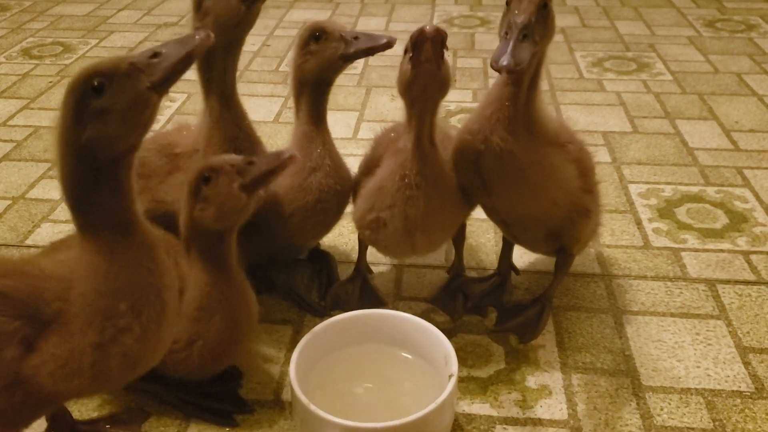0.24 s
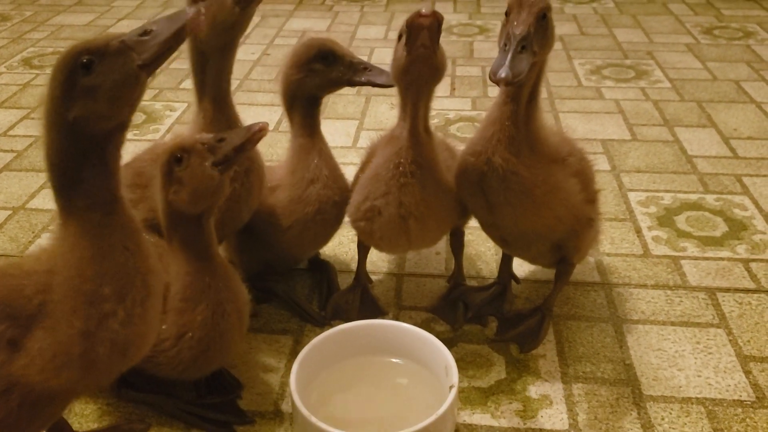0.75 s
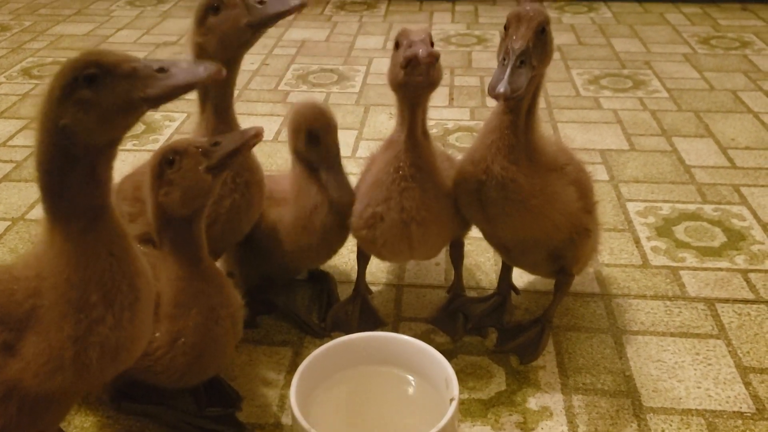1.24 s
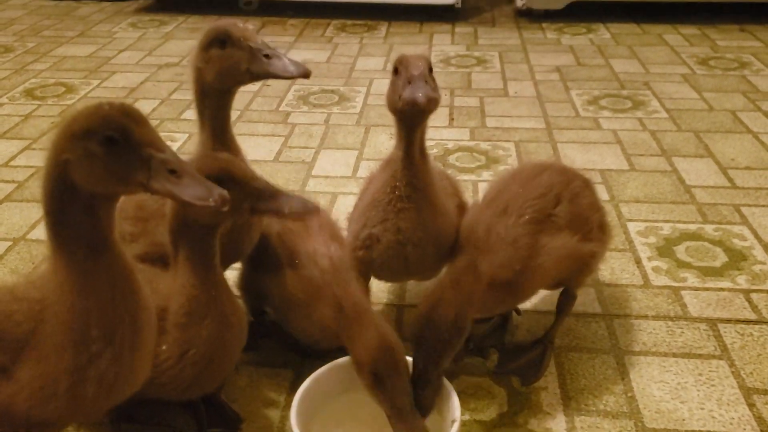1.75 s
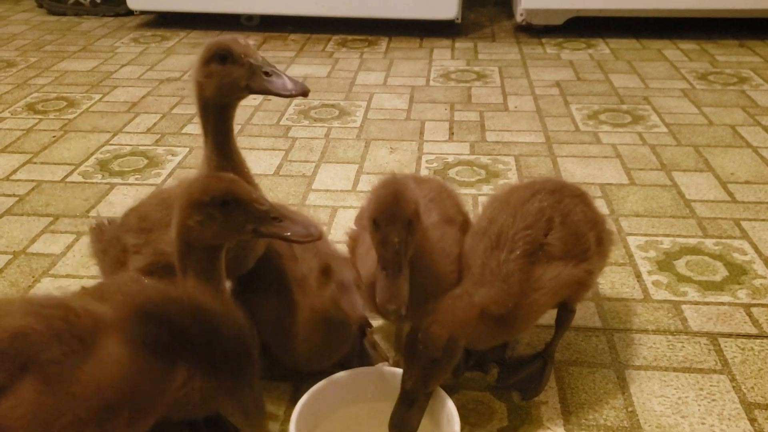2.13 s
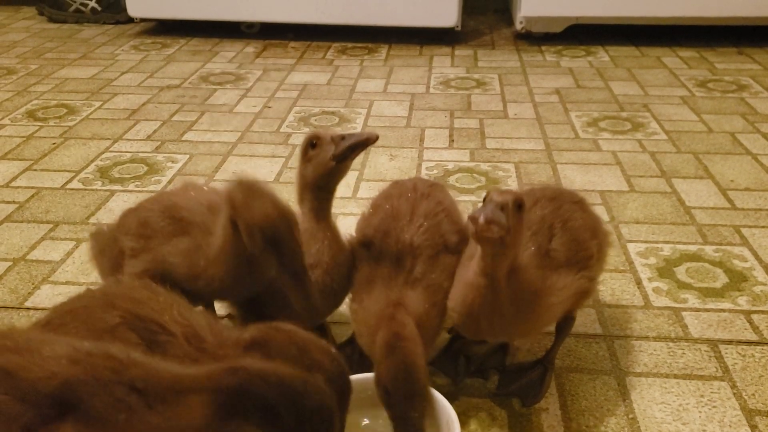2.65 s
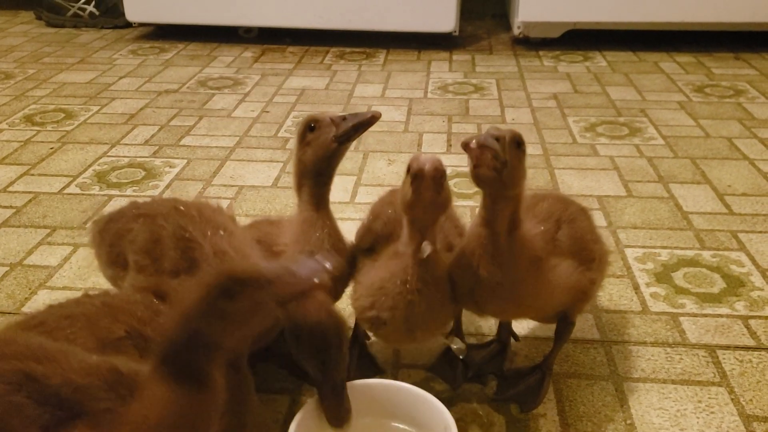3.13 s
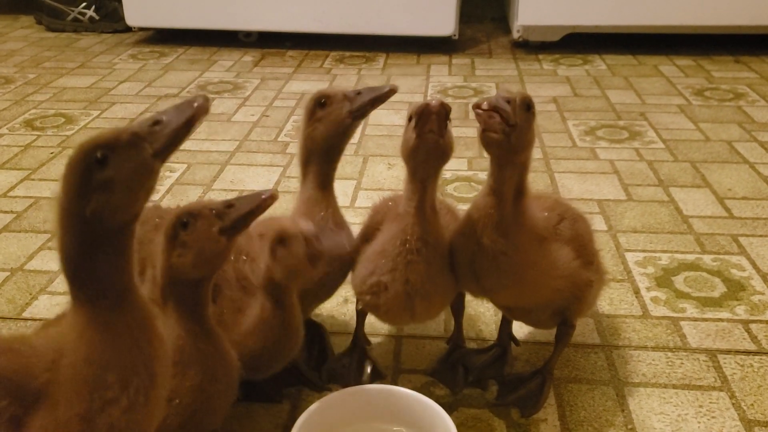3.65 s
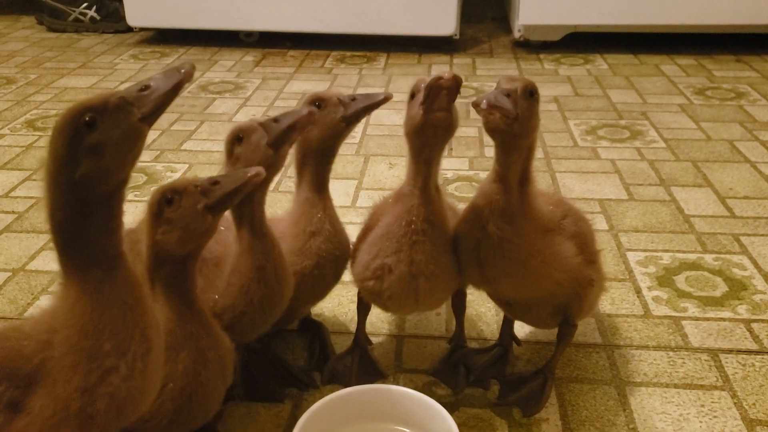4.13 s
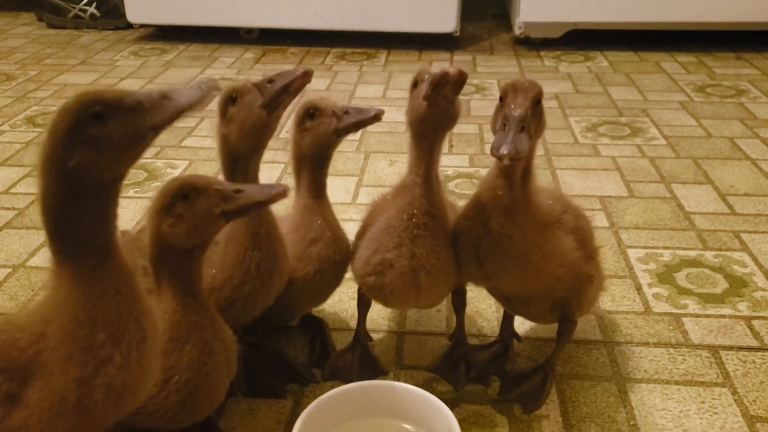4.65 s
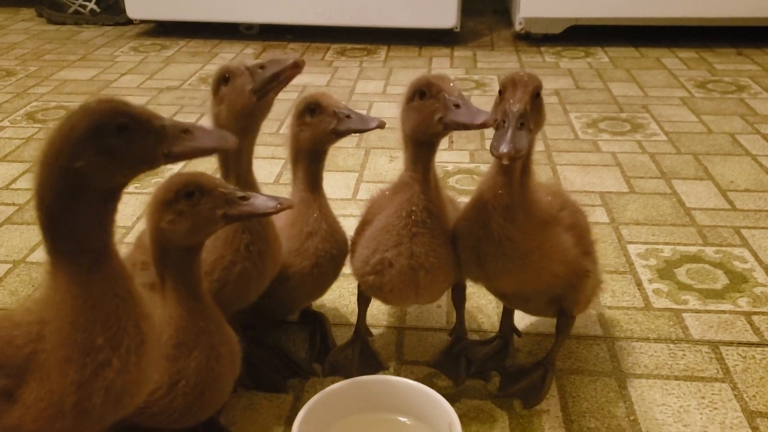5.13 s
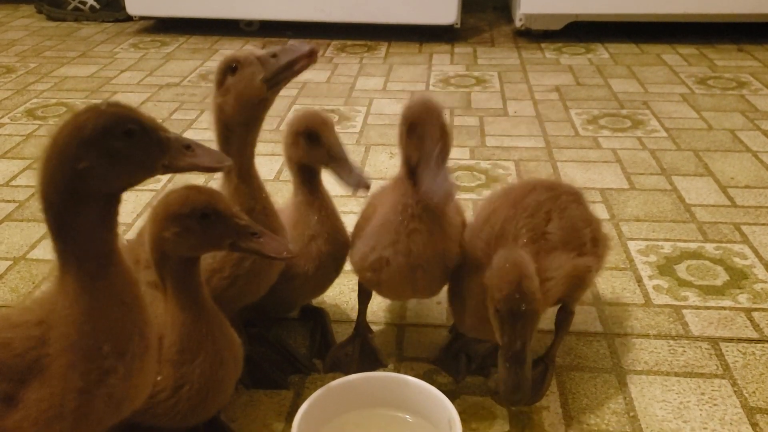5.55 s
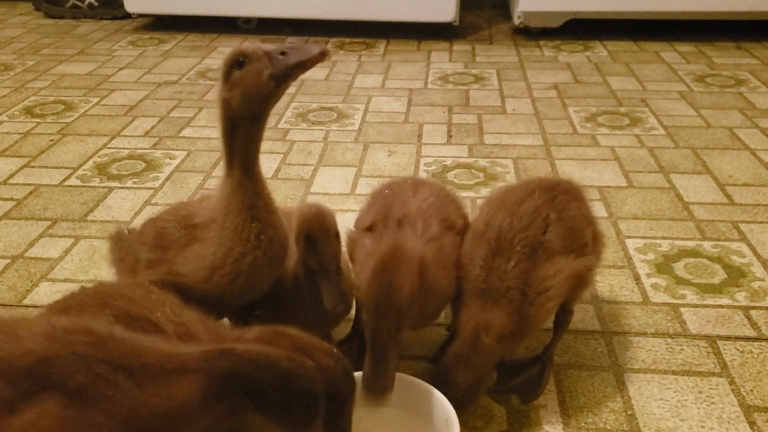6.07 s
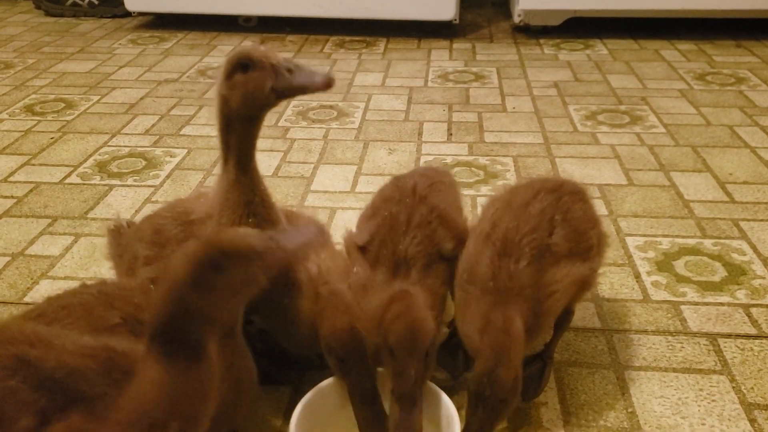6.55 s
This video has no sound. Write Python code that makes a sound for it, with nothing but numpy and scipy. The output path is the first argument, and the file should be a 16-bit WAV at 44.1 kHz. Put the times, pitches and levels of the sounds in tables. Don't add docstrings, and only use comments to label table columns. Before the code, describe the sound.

Close, slightly coloured stereo sound in a small kitchen: dry bill claps, wet little slurps and fine dabbling ticks over low floor rumble and a pulsing refrigerator hum. Clear gliding duckling whistles cluster in the first two seconds, one breaking hoarsely, and return near the end. The sharpest clapping comes around the middle and again late, with soft webbed-foot thuds.

```python
import sys
import numpy as np
from scipy import signal
from scipy.fft import rfft, irfft, next_fast_len
from scipy.io import wavfile
from scipy.ndimage import uniform_filter1d, map_coordinates

SR = 44100
rng = np.random.default_rng(int(sys.argv[2]) if len(sys.argv) > 2 else 0)


def gain_from_db(level_db):
    decades = np.asarray(level_db, float) / 20
    return 10 ** decades


def store_wav(level_fs):
    pcm = np.round(np.clip(np.atleast_2d(level_fs), -1, 1) * 32767)
    wavfile.write(sys.argv[1], SR, pcm.T.astype(np.int16))


N = 299880
TIME = np.arange(N) / SR


def unit(x):
    return x / np.sqrt(np.mean(x ** 2) + 1e-20)


def along(points, hz):
    f, v = np.transpose(points)
    return np.interp(np.log(hz + 1), np.log(f + 1), v)


def curve(rows):
    s, value = np.transpose(rows)
    return np.interp(TIME, s, value)


def wobble(rate):
    return map_coordinates(rng.standard_normal(int(N * rate / SR) + 4), [TIME * rate])


def filtered(x, response):
    m = next_fast_len(N + SR // 2)
    return irfft(rfft(x, m) * response(np.fft.rfftfreq(m, 1 / SR)), m)[..., :N]


def band(x, lo_hz, hi_hz):
    sos = signal.butter(3, [lo_hz, min(hi_hz, SR / 2 - 1)], "band", fs=SR, output="sos")
    return signal.sosfilt(sos, x)


def rush(response, alike, patchy_db):
    z = signal.stft(rng.standard_normal((2, N)), nperseg=512)[2]
    field = uniform_filter1d(rng.standard_normal(z.shape[1:]), size=6, axis=0)
    field = uniform_filter1d(field, size=8, axis=1)
    noise = signal.istft(z * gain_from_db(patchy_db * unit(field)), nperseg=512)[1][:, :N]
    a, b = filtered(noise, response)
    turn = np.arccos(np.clip(alike, 0, 1)) / 2
    return unit(np.array([np.cos(turn) * a + np.sin(turn) * b, np.cos(turn) * a - np.sin(turn) * b]))


def beat():
    throb_hz, crest_s = 4.965, .141
    return np.cos(2 * np.pi * throb_hz * (TIME - crest_s))


def refrigerator():
    hum = rush(lambda hz: 1 / (1 + ((hz - 232) / 22) ** 2), alike=1.0, patchy_db=3)
    return gain_from_db(-72.0 + 8.3 * beat()) * hum


# frequency in Hz, twice the level in dB (halved when used).
RUMBLE = [(15, -28), (25, -28), (54, 7), (70, 10.5), (160, -11.5), (210, -46), (350, -120)]
# frequency in Hz, twice the level in dB (halved when used).
SHUFFLE = [(82, -61), (140, 7.5), (178, -9), (225, 13), (507, -16), (716, -23), (786, -13.5), (1300, -44.5),
           (1690, -32), (2860, -120)]
# time in seconds, level in dB.
JOSTLING = [(0.0, -54.5), (.7, -56.5), (1.08, -60), (1.15, -49.5), (1.4, -56), (1.95, -47.5), (2.5, -57.5),
            (2.88, -53.5), (3.77, -59.5), (5.34, -57), (5.77, -62), (5.98, -50), (6.38, -55), (6.8, -52.5)]


def floor_noise():
    shake_s, rise_s = 0.071, 0.0063
    crowd_s, crowd_db = 5.1, 9
    shake = 0
    for s, db, _ in STEPS:
        fade = (TIME > s) * np.exp(-abs(TIME - s) / shake_s)
        shake = shake + gain_from_db(0.94 * (db + 28) - 30.5) * fade * np.tanh((TIME - s) / rise_s)
    near = gain_from_db(crowd_db * np.clip((TIME - crowd_s) * 10, 0, 1))

    rumble_gain = near ** .5 * gain_from_db(-67.5 + 1.6 * wobble(3.08)) + gain_from_db(-26.5) * shake
    rumble = rush(lambda hz: gain_from_db(along(RUMBLE, hz) / 2), alike=0.86, patchy_db=0.0)
    rumble = rumble_gain * gain_from_db(3.5 * wobble(13)) * rumble

    jostle_db = curve(JOSTLING)
    jostle_share = 0.74
    shuffle_gain = near * gain_from_db(-66.5 + jostle_share * (jostle_db - jostle_db.mean())) + gain_from_db(-25) * shake
    shuffle = rush(lambda hz: gain_from_db(along(SHUFFLE, hz) / 2), alike=0.68, patchy_db=5.0)
    return rumble * gain_from_db([[-1.5], [1.5]]) + shuffle_gain * gain_from_db(1.86 * beat()) * shuffle


def snaps(times, levels_db, pans_db, life, lo_hz, hi_hz):
    t = np.arange(256) / SR
    answer = (t > .0018) * gain_from_db(-60 * (t - .0018) / (2.9 * life))
    shape = np.exp(-((t - life / 5) / (life / 6)) ** 2) + 0.356 * answer
    grit = rng.standard_normal((len(times), 256))
    blow = t == t[shape.argmax()]
    bursts = band(0.23 * shape * grit + blow, lo_hz, hi_hz)
    bursts /= abs(bursts).max(1, keepdims=True)
    at = np.round(times * SR).astype(int)[:, None] + np.arange(256)
    lag = rng.integers(0, 2, (len(times), 2))
    sides = []
    for k in (0, 1):
        gain = gain_from_db(levels_db + (.5 - k) * pans_db)[:, None]
        sides.append(np.bincount((at + lag[:, [k]]).ravel(), (bursts * gain).ravel(), N + 512)[:N])
    return np.array(sides)


def dabbling(level_db):
    draw = rng.random((3, 900, 3))
    s = draw[..., 0] * (N / SR)
    size_db = np.interp(s, TIME, level_db + 4.5 * wobble(12)) - 3.5 * np.log(.04 + draw[..., 1])
    kinds = [(7900, 12100, 0.0077, 0.5), (3480, 4520, .004, 0.0), (1410, 5300, 0.003416, 3.0)]  # Hz, Hz, s, dB
    out = 0
    for k, (lo_hz, hi_hz, life, db) in enumerate(kinds):
        out = out + snaps(s[k], size_db[k] + db, 8 * draw[k, :, 2] - 4, life, lo_hz, hi_hz)
    return out


# time in seconds, level in dB.
PREENING = [(0.0, -64.5), (.34, -59.5), (.79, -63), (1.84, -62), (2.12, -57.5), (2.4, -66.5), (2.82, -49.5),
            (3.09, -57.5), (3.14, -73), (3.48, -55), (3.6, -68), (4.07, -60), (5.1, -70), (5.33, -53.5),
            (5.66, -73), (5.87, -77), (6.1, -62.5), (6.44, -56.5)]


def stir():
    rustle_db, murmur_db = curve(PREENING), curve(JOSTLING)
    airy = rush(lambda hz: 1 / (1 + (5000 / (hz + 1)) ** 4), alike=.1, patchy_db=1.6)
    rustle = gain_from_db(rustle_db + 14.5 + 3.25 * wobble(16) + 0.33 * wobble(11.0)) * airy
    steady = rush(lambda hz: 1 / (1 + (750 / (hz + 1)) ** 8) / (1 + (hz / 5000) ** 4), alike=.05, patchy_db=2.4)
    murmur = gain_from_db(murmur_db + 9.0) * gain_from_db(1.2 * wobble(14)) * steady
    return rustle + murmur + dabbling((rustle_db + murmur_db) / 2 + 15)


# time in seconds, peak in dB, middle part in dB, left over right in dB.
CLAPS = [(0.1365, -32.5, -20, 5.5), (0.3164, -36, -10, 0), (0.3448, -28.5, -7.5, -5),
         (.414, -26.5, -16.5, -4), (1.984, -37, -2, -2), (1.9967, -33.5, -10, -4), (2.0609, -22.5, -9, 0),
         (2.091, -24, -21, -2), (2.737, -22.5, -8, -1), (2.8358, -14.5, -17, -2), (2.8764, -38, -18, -3),
         (2.8908, -14, -35.5, -3.5), (2.963, -30, -23, -3), (3.025, -26.5, -18, 2), (3.077, -34.5, -25, -5),
         (3.3356, -38, -26, -3), (3.356, -18, -41, -10.5), (3.4343, -44, -4, 3), (3.8993, -40.5, -19, 15),
         (3.993, -40, -25, 3), (4.0423, -36, -54, 1.5), (4.2894, -37, -24, 3), (4.361, -39, -19, 7),
         (4.7222, -40, -7, 1), (4.738, -30.5, -13.5, -5), (6.2492, -13, -17.5, 2), (6.297, -21, -17, 6),
         (6.555, -33, -23, 9), (6.563, -11.5, -29, 1), (6.7835, -25, -21.5, 1), (1.8678, -39, -14, 2),
         (2.1916, -44, -6, 2), (2.3662, -38.5, -6, 2), (2.5023, -47, -9, 1), (2.5546, -44, -15, 0),
         (2.6605, -27, -26, 1), (2.7912, -35, 0, 2.5), (2.827, -31, -30, 0), (2.9818, -41, -4, 3),
         (3.007, -43, 0, 0), (3.1125, -45, -2, 2), (3.314, -43, -10, 1), (6.242, -36, -6, 0),
         (6.274, -40, 3, 3.5), (6.302, -31, -3, 0), (6.381, -33, -22, -5), (6.434, -35, -22, 0),
         (6.45, -39.5, -7, 0), (6.505, -26, -24, 0), (6.652, -35, -21, -2)]
# time in seconds, peak in dB, left over right in dB.
DROPS = [(.0232, -41.5, 3), (1.2045, -39.5, 5), (1.8991, -26.5, 12), (1.9246, -27, -9), (2.2853, -33, 2),
         (2.585, -37.5, -3), (2.768, -24.5, 1), (2.927, -34, -8), (3.403, -38, 2), (3.468, -36, 8),
         (4.9032, -41.5, 4), (5.1598, -56, 19), (5.99, -34.5, -2), (6.045, -31, -3), (6.288, -29, 6),
         (6.344, -36, 1.5), (6.3995, -35.5, 1), (6.4103, -31, 0), (6.469, -37, 8), (6.4875, -26, -3),
         (6.619, -36, -5), (6.64, -33.5, 12), (6.6793, -26, 12), (6.7231, -42, -11)]
# time in seconds, peak in dB, left over right in dB.
TICKS = [(0.8981, -44, -15), (1.051, -51, 23), (1.5637, -49, -3), (1.7466, -47.5, 4), (2.137, -40, 12),
         (2.325, -44.5, 3), (2.7076, -40.5, 5), (3.153, -49, -13), (3.2792, -53, -1), (6.2056, -46.5, 10),
         (6.7361, -33.5, -1), (2.5661, -56, 0), (2.6289, -56, 0), (3.2552, -53, 0), (3.4785, -52, -2),
         (6.2635, -46, 0), (6.2816, -43.5, 0), (6.429, -48, 0), (6.7385, -32, 3)]


def smacks():
    rows = [(s, db, -31, mid_db, pan_db) for s, db, mid_db, pan_db in CLAPS]
    rows += [(s, db, -8.5, -9, pan_db) for s, db, pan_db in DROPS]
    rows += [(s, db, 2, 1, pan_db) for s, db, pan_db in TICKS]
    s, db, low_db, mid_db, pan_db = np.transpose(rows)
    top = snaps(s, db + 13.5, pan_db, life=0.0026, lo_hz=9930, hi_hz=16500)
    middle = snaps(s, db + mid_db + 20.5, pan_db, life=0.0028, lo_hz=4000, hi_hz=9000)
    wet = snaps(s, db + low_db + 20.0, 0 * s, life=0.0106, lo_hz=1230, hi_hz=3680)
    return top + middle, wet


# time in seconds, peak in dB, share of the upper modes from 0 to 1.
STEPS = [(0.297, -36.5, 0.47), (0.345, -56, 0.1), (0.743, -46, 0.78), (1.922, -40, 0.5),
         (2.011, -43.5, 0.6), (2.749, -26, 0.87), (2.742, -33.5, 0.6), (2.885, -34, 0.6),
         (3.109, -55, 0.68), (3.217, -44, 0.42), (3.925, -43, 0.33), (5.139, -53.5, 0.2), (5.99, -28, 0.44),
         (6.468, -41, 0.42), (6.752, -37.5, 0.3)]
# frequency in Hz, level in dB, time to fall 60 dB in seconds.
BOARDS = [(136, -20, 0.61), (200, 5, 0.083), (325.5, 3, 0.065), (443, -15, 0.058), (757, -22.5, 0.14)]


def steps():
    out, t = np.zeros(N + SR), np.arange(SR // 2) / SR
    for s, db, upper in STEPS:
        ring = 0
        for hz, level, t60 in BOARDS:
            share = np.clip(upper if hz > 260 else 1 - upper, .02, 1)
            tone = np.sin(2 * np.pi * hz * (1 + rng.normal(0, 0.062)) * t)
            ring = ring + share * gain_from_db(level - 60 * t / t60) * tone
        out[round(s * SR):][:len(t)] += gain_from_db(db - 2.0) * ring * (1 - np.exp(-t / 0.0026))
    return out[:N]


def warble(peep, pushes):
    swell_db_per_s, snap_s = 950, 0.021
    sag_share = .45
    start, end, opening_hz = peep[:3]
    own = [p for p in pushes if start < p[0] < end]
    first_s, first_db = own[0][0], own[0][2]
    rows = [(start, opening_hz, first_db - swell_db_per_s * (first_s - start - snap_s))]
    lows = [p[0] + sag_share * (after[0] - p[0]) for p, after in zip(own, own[1:])] + [end]
    for (s, hz, db, sag_hz, loss_db), low in zip(own, lows):
        rows += [(s, hz, db), (low, hz - sag_hz, db - loss_db)]
    return rows


def voice(rows, partials, flutter_db, break_hz=2560):
    s, hz, db = np.transpose(rows)
    t = np.arange(s[0] - .004, s[-1] + 0.007, 1 / SR)
    knots = np.arange(len(s))
    place = np.interp(t, s, knots)
    eased = np.floor(place) + (1 - np.cos(np.pi * (place % 1))) / 2
    swoop = place + np.sin(np.pi * (place % 1)) * np.sign(1 - place) / 4
    eased = np.where((place < 1) | (place > len(s) - 2), swoop, eased)
    pitch = np.interp(eased, knots, hz)
    strain = np.clip((pitch - break_hz) / 300, 0, 1)
    jitter = np.interp(t - t[0], np.arange(400) / 900, rng.standard_normal(400))
    phase = 2 * np.pi * np.cumsum(pitch * (1 + (0.06 * strain + .0002 * flutter_db ** 3) * jitter)) / SR
    flutter_hz = 110 + 55 * flutter_db
    flutter = flutter_db * map_coordinates(rng.standard_normal(256), [(t - t[0]) * flutter_hz])
    tone = 0
    for k, level in partials:
        share = 1 if k < 2 else .4
        tone = tone + gain_from_db(level + flutter * share) * np.sin(k * phase)
    fade = signal.windows.tukey(len(t), 0.025 * SR / len(t))
    out, start = np.zeros(N), round(t[0] * SR)
    out[start:start + len(t)] = tone * gain_from_db(np.interp(eased, knots, db)) * fade
    return out


# start in seconds, end in seconds, opening pitch in Hz, overtones in dB, rasp in dB.
PEEPS = [(.892, 1.157, 1513, -6, .9), (1.26, 1.52, 1647, 1, .5), (1.645, 1.845, 1890, 3, 2.6),
         (1.875, 1.92, 1588, -6, 1.5), (2.11, 2.145, 1420, -16, 3), (2.225, 2.27, 1872, -7, 3),
         (2.785, 2.82, 1635, -8, 1), (5.572, 5.642, 1585, 2, .5), (5.65, 5.782, 1760, 11, 3),
         (5.856, 5.915, 1590, -6, 1.5), (5.948, 6.15, 1583, -2, .5), (6.398, 6.465, 2236, -8, .4),
         (6.585, 6.655, 1448, -3, .5)]
# time in seconds, pitch in Hz, effort in dB,
# sag afterwards in Hz, effort lost in the sag in dB.
PUSHES = [(0.933, 2187, -12.5, 110.5, 8.5), (0.999, 2243, -19.5, 74, 0.5), (1.051, 2375, -20.5, 267.5, 0.3),
          (1.13, 2442, -15.5, 666, 11), (1.283, 1928, -25, 212, 5), (1.379, 2113, -16.5, 243.5, 5.5),
          (1.5, 2047, -18.5, 375, 12), (1.686, 2570, -17, 461.5, 13), (1.764, 2354, -24, 915, 17),
          (1.895, 2005, -23.5, 292, -0.5), (2.13, 1536, -29.5, 145, -3), (2.255, 2820, -11, 80, 18),
          (2.799, 1750, -29.5, 100, 1), (5.606, 2007, -16, 328, 27), (5.679, 1850, -34, -28.5, 4.5),
          (5.755, 2013, -26, 330, 8), (5.87, 2210, -17.5, -400, -2), (5.886, 2830, -19, 85, 8),
          (5.98, 1942, -19, -46.5, -0.3), (6.032, 2044, -17, 89, 2.5), (6.119, 2115, -17, 478, 13),
          (6.419, 2218, -35, -24, 11), (6.625, 1950, -19.5, 369, 13)]
FAR_PEEP = (5.572, 5.595, 1976, -15, 4.5)
FAR_PUSH = [(5.587, 2270, -33.5, -240, 4.3)]
# multiple of the pitch, level in dB.
OVERTONES = [(2, -13), (3, -27), (4, -32), (5, -35), (6, -36)]
# frequency in Hz, gain in dB.
THROAT = [(3000, 0.5), (4150, -2), (4500, -8), (4950, -1), (6000, -0.5), (6500, -4), (7100, 2), (7900, 3.5)]
# start in seconds, end in seconds, from Hz, to Hz,
# level in dB.
SQUEAKS = [(.962, .998, 2780, 3020, -39), (1.035, 1.059, 3230, 3480, -38.5),
           (1.096, 1.135, 2980, 3300, -35), (1.74, 1.76, 4050, 4150, -36)]
# time in seconds, pitch in Hz, level in dB.
CROAK = [
    (1.626, 331, -58),
    (1.638, 425, -36),
    (1.648, 515, -48),
    (1.656, 417, -48),
    (1.71, 449, -61),
    (1.73, 420, -69),
]


def peeps():
    whistles, squeaks = 0, 0
    for peep, pushes in [(p, PUSHES) for p in PEEPS] + [(FAR_PEEP, FAR_PUSH)]:
        partials = [(1, 0)] + [(k, db + peep[3]) for k, db in OVERTONES]
        whistles = whistles + voice(warble(peep, pushes), partials, peep[4])
    for s, end, hz, end_hz, db in SQUEAKS:
        squeaks = squeaks + voice([(s, hz, db), (end, end_hz, db)], [(1, 0)], flutter_db=2.5, break_hz=6000)
    husk = voice(warble(PEEPS[2], PUSHES), [(.8, -18), (1.45, -21)], flutter_db=4)
    stack = [(1, 10.5), (2, 8.0), (3, 10), (4, 10.0), (5, 14.5), (6, 12), (7, 6), (8, -2), (9, -2)]
    croak = gain_from_db(-2) * voice(CROAK, stack, 3.06)
    return filtered(whistles, lambda hz: gain_from_db(along(THROAT, hz))) + squeaks + husk + croak


# start in seconds, length in
# seconds, centre in Hz, width in Hz, level in dB.
SLURPS = [(1.9, 0.053, 1720, 860, -35), (2.231, 0.052, 2550, 1200, -33.5), (2.76, 0.033, 3280, 2600, -27),
          (2.99, 0.069, 1700, 650, -44.5), (3.237, 0.034, 2270, 600, -38.5), (3.607, 0.079, 1990, 750, -39),
          (3.053, 0.01, 2800, 560, -31), (3.276, 0.006, 4200, 3000, -27),
          (4.887, 0.088, 11600, 3700, -42.5), (1.559, 0.014, 4130, 700, -36.5),
          (1.64, 0.011, 1800, 2300, -31), (5.6, 0.036, 1440, 1600, -51), (5.88, 0.04, 2500, 1300, -34),
          (6.271, 0.029, 2930, 3700, -32.5), (6.432, 0.058, 1310, 990, -34),
          (6.551, 0.0097, 1540, 780, -22), (3.353, 0.01, 2600, 2600, -25), (3.474, 0.089, 770, 560, -47),
          (6.287, 0.042, 6300, 2940, -34.5), (6.674, 0.012, 4100, 5100, -22.5),
          (6.726, 0.014, 2460, 1400, -44), (1.853, 0.011, 1400, 1400, -37), (6.676, .011, 13000, 6300, -30),
          (1.919, .013, 12800, 3000, -31), (7.5, 0.0054, 7400, 1200, -28), (1.203, .006, 4760, 800, -28.5),
          (6.616, 0.023, 15000, 5000, -39)]


def slurps():
    out = np.zeros((2, N + SR))
    for s, length, hz, width_hz, db in SLURPS:
        t = np.arange(int(2 * length * SR)) / SR
        grain = np.interp(t, np.arange(100) / 350, rng.standard_normal(100))
        noise = rng.standard_normal((2, len(t)))
        noise = unit(band(noise, max(hz - width_hz / 2, 200), hz + width_hz / 2))
        swell = (1 - np.exp(-t / 0.0012)) * np.exp(-(t / length) ** 4)
        out[:, round(s * SR):][:, :len(t)] += gain_from_db(db + 3.74 * grain) * noise * swell
    return out[:, :N]


# frequency in Hz, time to fall 60 dB in seconds.
KITCHEN = [(300, 0.58), (2000, 0.39), (6000, 0.18), (14000, 0.1)]


def kitchen(x):
    hz, t, z = signal.stft(rng.standard_normal((2, SR // 2)), SR, nperseg=256)
    tail = signal.istft(z * gain_from_db(-60 * t / along(KITCHEN, hz)[:, None]), SR, nperseg=256)[1]
    late = np.pad(np.atleast_2d(x), ((0, 0), (200, 0)))
    return signal.fftconvolve(late, tail / np.linalg.norm(tail[0]), axes=1)[:, :N]


# frequency in Hz, gain in dB.
LEFT = [(500, -12), (800, -13.5), (1300, -24), (1900, -16.5), (2300, -19), (2900, -12.5), (3700, -15.5),
        (5500, -12), (7000, -5), (8400, -18), (11800, -9.5), (14000, -8.5), (15700, -22.5)]
# frequency in Hz, gain in dB.
RIGHT = [(500, -13.5), (1000, -22.5), (1500, -14), (1950, -1.5), (2150, -4), (2750, -17), (3800, -10.5),
         (4500, -12), (5200, -35.5), (6000, -28), (7200, -6.5), (8500, -17), (11500, -10), (15700, -13)]


def ports(x):
    hz = np.fft.rfftfreq(4096, 1 / SR)
    gain = np.log(gain_from_db([along(p, hz) for p in (LEFT, RIGHT)]))
    fold = np.r_[1, np.full(2047, 2), 1, np.zeros(2047)]
    return signal.fftconvolve(x, irfft(np.exp(rfft(irfft(gain) * fold))), axes=1)[:, :N]


def scene():
    low_end = refrigerator() + floor_noise()
    stirring = stir()
    dry_smacks, wet = smacks()
    feet = steps()
    calls = peeps()
    wet = wet + slurps()
    air = calls * gain_from_db([[-3.5], [0]]) + gain_from_db(-13.5) * kitchen(calls)
    air = air + wet + gain_from_db(-11.0) * kitchen(wet) + stirring
    air[1] = np.roll(air[1], 3)
    air += dry_smacks + gain_from_db(-25) * kitchen(dry_smacks)
    return ports(air) + feet + gain_from_db(-8.0) * kitchen(feet)[0] + low_end


def band_limit(x):
    return signal.sosfilt(signal.butter(12, 17110, fs=SR, output="sos"), x)


def record(dry):
    soft = filtered(dry, lambda hz: np.where(hz < 15800, 1, gain_from_db(-25)) * (hz < 16800))
    return band_limit(soft)


dry = scene()
out = record(dry)
store_wav(out)
```